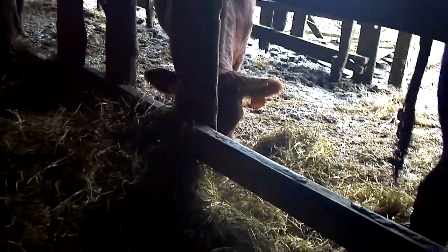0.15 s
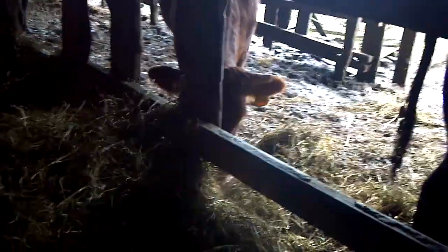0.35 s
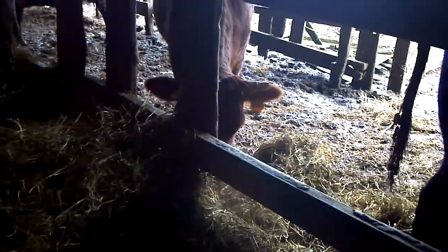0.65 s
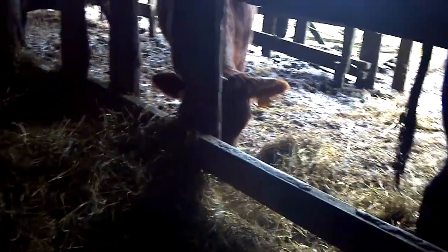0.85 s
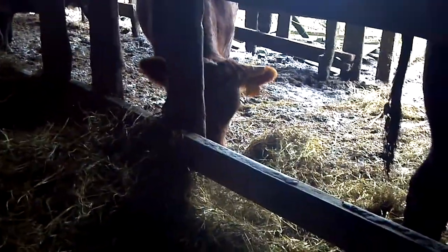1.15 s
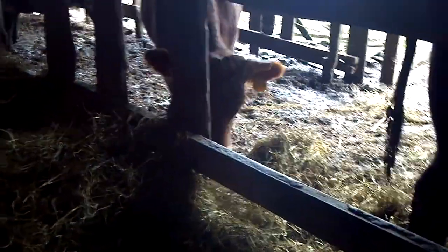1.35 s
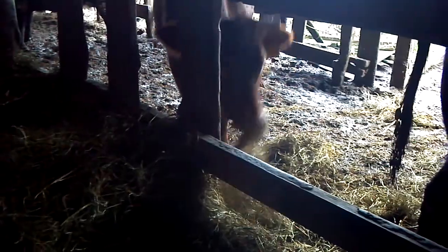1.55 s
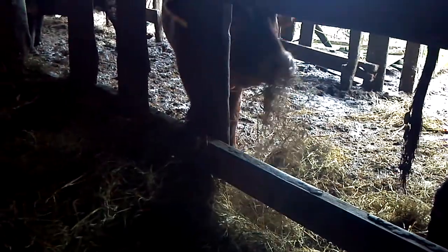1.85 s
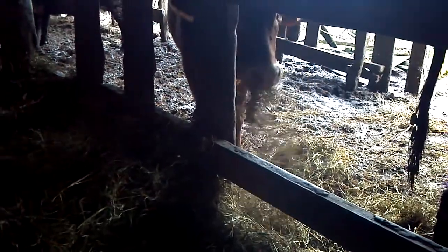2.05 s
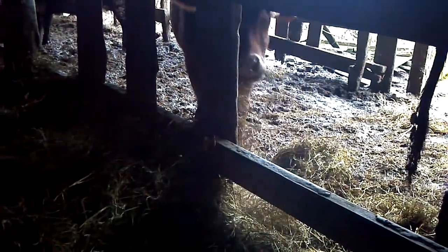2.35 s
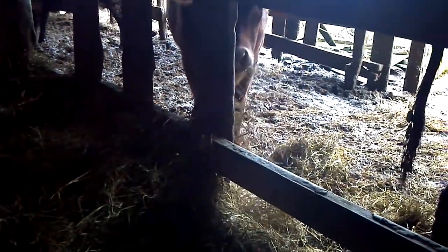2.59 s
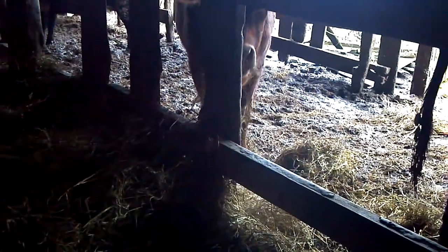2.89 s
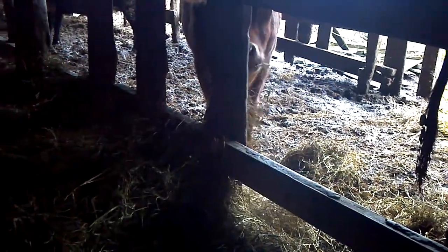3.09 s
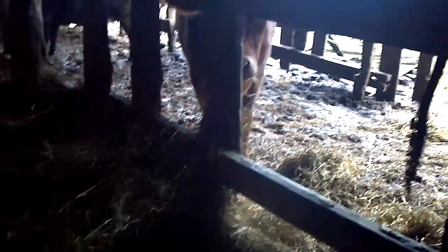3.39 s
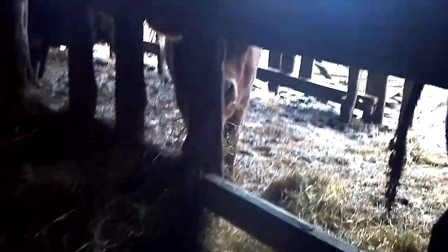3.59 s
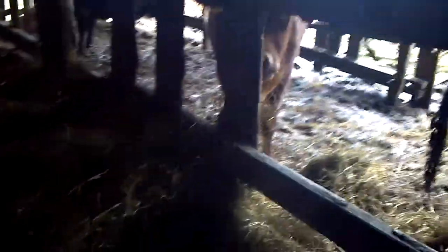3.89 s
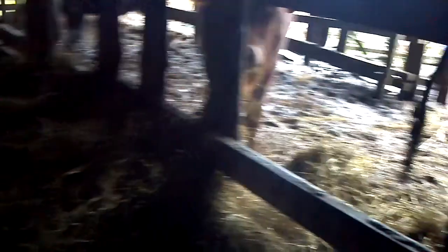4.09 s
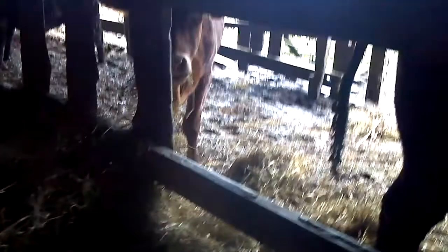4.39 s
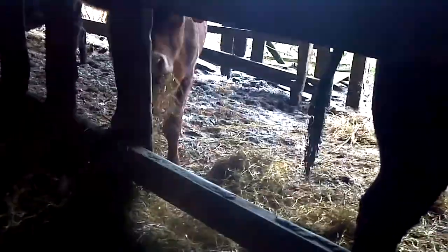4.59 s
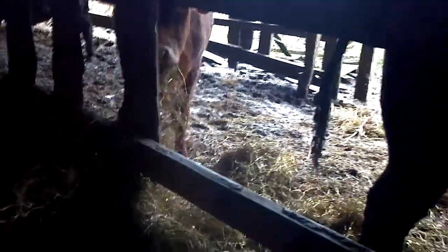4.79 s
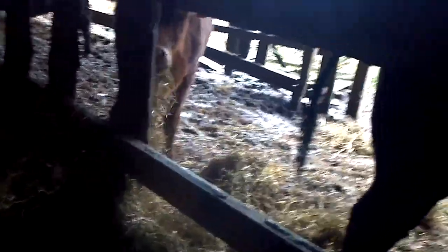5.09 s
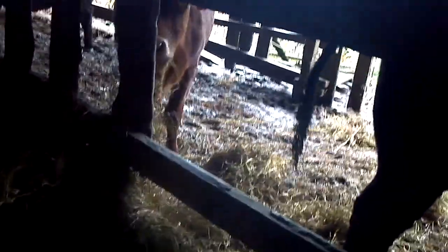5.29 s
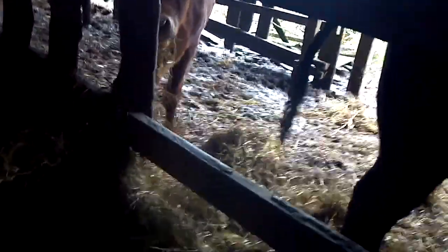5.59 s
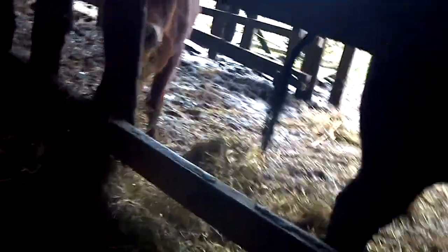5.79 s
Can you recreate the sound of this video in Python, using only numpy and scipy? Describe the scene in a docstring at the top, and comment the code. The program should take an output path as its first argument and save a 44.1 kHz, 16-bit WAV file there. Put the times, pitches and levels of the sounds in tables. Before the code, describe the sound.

Two cow moos, one brief and one long, each rising from a growl and breaking off hoarsely, with hay rustling and wooden knocks between.

```python
"""Cow in a wooden barn

A cow moos twice, a short call and a long one: pulses from the vocal folds ring the throat and mouth.
Each call starts as a low growl, climbs to a clear tone and breaks up as the pitch drops.
Between the calls she tugs at hay (clumps of tiny clicks) and bumps the feed rail (ringing modes).
Just after the second call a dry tick taps the housing of the closely spaced microphone pair;
a last soft rustle of hay follows. Echoes from the boards and a steady farmyard hush surround it all."""
import sys
import numpy as np
from scipy import signal
from scipy.fft import rfft, irfft, next_fast_len
from scipy.io import wavfile
from scipy.ndimage import uniform_filter1d

SR = 44100
rng = np.random.default_rng(int(sys.argv[2]) if len(sys.argv) > 2 else 0)


def to_wav(sig):
    """Store sig (one row per channel, or 1-D mono) as 16-bit WAV at the path in sys.argv[1].

    Samples outside -1..1 are clipped; the rate is SR.
    """
    pcm = np.clip(np.atleast_2d(sig), -1, 1) * 32767
    pcm = np.round(pcm).astype(np.int16)
    wavfile.write(sys.argv[1], SR, pcm.T)  # frames by channels


N = 262173
TIME = np.arange(N) / SR
SIZE = next_fast_len(N + SR)   # padded, so that filters do not wrap round
FREQ = np.maximum(np.arange(SIZE // 2 + 1) * SR / SIZE, 1)

# still air of the farmyard: f/Hz, relative density level/dB
YARD_SPECTRUM = [(25, -53), (55, -26.5), (90, -2.5), (140, -3), (300, -2), (700, -6), (1400, -11),
                 (2800, -14), (6000, -16), (11000, -16.5), (15000, -16.5)]
HUSH_DB = -61.5

# decay of the barn's echoes: f/Hz, t60/s
BARN_T60 = [(150, 0.31), (400, 0.37), (1500, 0.27), (4000, 0.32), (12000, 0.035)]
# standing waves of the barn that ring on after the voice: f/Hz, width/Hz, level/dB
BARN_MODES = [(358, 5, -6), (790, 9, -19)]
# pitches that the barn reinforces: f/Hz, width/Hz, level of the added resonance/dB
BARN_PEAKS = [(434.5, 16.7, 8), (538.6, 11, 2), (622, 17, 4.5), (676.7, 13, 11.5), (749.3, 35.4, 12),
              (1233, 66, 7.5), (1430, 19.7, 7.5), (1527, 7.3, 8.5), (1567, 20, 3.5), (1601, 55, 9.5),
              (1872, 37, -1), (1994, 60, 1.5), (2292, 55, 4)]

# level difference of the microphone pair: f/Hz, left minus right level/dB
PAIR_BALANCE = [(60, 0), (160, 5.8), (365, 6.6), (520, 1), (740, 1.5), (1220, 0), (2000, .5), (3300, 1.2),
                (5500, .3), (15000, 0)]
# phase by which the left microphone leads, before the lag above the knee: f/Hz, lead/rad
PAIR_LEAD = [(60, 4), (170, 1.62), (270, 1.2), (312, 0.9), (335, 0.48), (362, 2.59), (400, 1.6),
             (520, 0.078), (700, 1), (1000, 0.011)]
PAIR_LAG_S, PAIR_KNEE_HZ = 1 / 2640, 1320
CUTOFF_HZ = 15700

# resonances of the microphone housing: f/Hz, t60/s, left level/dB, right level/dB
HOUSING_MODES = [(296, 0.002, -35, -22.5), (1454, 0.003, 3, -35.5), (4730, 0.0012, -8.5, 7.5),
                 (8840, 0.00083, -22, 8), (14200, 0.00062, -10, 7.5)]
TAP_S, TAP_LEFT_LATE_S = 5.0152, 0.00033

# bumps against the feed rail: t/s, relative level/dB, spot f/Hz, scuff decay/s, share of the rail's ring/dB
BUMPS = [(2.027, -49.5, 320, 0.006, -1), (2.151, -36.5, 625, 0.0029, 3.5), (2.283, -51.5, 1350, 0.01, -1),
         (2.51, -50, 900, 0.0023, 2), (2.549, -46, 620, 0.005, 2.5), (2.785, -45.5, 1000, 0.004, -12)]
# modes of the rail: f/Hz, relative level/dB, t60/s
RAIL_MODES = [(620, -16, 0.06), (980.6, -8, 0.045), (1308.8, -15, 0.063), (1855, -3, 0.024),
              (3180, -0.5, 0.016), (4020, -4, .015), (5970, -5.5, .02)]

# tugs at the hay: peak t/s, swell/s, dull rustle level/dB, crisp rustle level/dB
HAY_TUGS = [(2.01, 0.04, -59, -64.5), (2.153, 0.015, -58, -56), (2.3, 0.013, -56, -72),
            (2.384, 0.008, -58.5, -66), (2.425, 0.025, -52.5, -60), (2.558, 0.0048, -60, -71),
            (2.94, 0.032, -89, -67), (2.98, 0.02, -61.5, -82), (5.85, 0.14, -64.5, -65.5)]
# colour of the dull rustle: f/Hz, relative level/dB
HAY_DULL = [(50, -44), (150, -6), (350, 2), (650, 0.5), (1500, 0), (2300, -10.5), (3500, -34)]
# colour of the crisp rustle: f/Hz, relative level/dB
HAY_CRISP = [(1800, -36), (3000, 9), (6500, 8), (9000, 5.5), (15000, -14)]
HAY_SETTLE_S = 0.027   # the stalks settle after each tug

# a soft closed-mouth groan in the opening of the first call
GROAN_PEAK_S, GROAN_SWELL_S, GROAN_PEAK_DB = 0.77, 0.088, -49
GROAN_HZ, GROAN_WIDTH_HZ = 398, 630

# the two calls: start t/s, break of the voice t/s, end t/s
MOOS = [(0.601, 1.603, 1.72), (3.045, 4.854, 4.99)]
# pitch of the short call before the sag at its break: t/s, f/Hz
PITCH_SHORT = [(0.62, 78.9), (0.816, 94.44), (0.904, 107.5), (1.0, 124.4), (1.06, 137.8), (1.13, 144.3),
               (1.254, 151.5), (1.398, 157.1), (1.52, 156.4), (1.61, 151.4)]
# pitch of the long call before the sag at its break: t/s, f/Hz
PITCH_LONG = [(3.08, 78.43), (3.148, 86.2), (3.34, 127.1), (3.43, 141.2), (3.504, 148.4), (3.802, 166.5),
              (4.016, 174), (4.394, 179.8), (4.63, 182.1), (4.70, 181.2), (4.79, 178.2), (4.86, 169.7)]
# effort of the short call, as the level from the open mouth before its trim: t/s, level/dB
EFFORT_SHORT = [(0.62, -73.5), (0.85, -53), (0.885, -41), (1.064, -36), (1.13, -35.5), (1.185, -34),
                (1.23, -36.5), (1.42, -31), (1.55, -29.5), (1.66, -37), (1.72, -61)]
# effort of the long call, likewise: t/s, level/dB
EFFORT_LONG = [(3.08, -70.5), (3.12, -55), (3.18, -45.5), (3.5, -33), (3.73, -30.5), (3.872, -25.5),
               (4.04, -24.5), (4.22, -31), (4.386, -21), (4.53, -24.5), (4.666, -28), (4.77, -27.5),
               (4.862, -26), (4.98, -52)]
# nasal hum of the short call before its trim: t/s, level/dB
HUM_SHORT = [(0.62, -71), (0.73, -68), (0.79, -58), (0.86, -49), (0.9, -44), (0.98, -36), (1.08, -30),
             (1.135, -35.5), (1.18, -32.5), (1.26, -35.5), (1.39, -25), (1.52, -23.5), (1.62, -24.5),
             (1.69, -34), (1.72, -37.5)]
# nasal hum of the long call, likewise: t/s, level/dB
HUM_LONG = [(3.08, -67), (3.16, -52.5), (3.3, -40), (3.39, -31.5), (3.47, -37.5), (3.55, -32),
            (3.65, -24.5), (3.79, -29), (3.92, -21), (4.22, -19), (4.58, -28.5), (4.73, -21), (4.85, -21.5),
            (4.89, -26), (4.98, -31.5)]
# main resonance of the mouth, which climbs late in the long call: t/s, f/Hz
MOUTH = [(1.08, 1220), (1.18, 1620), (1.27, 1280), (1.5, 1267), (4.15, 1214), (4.27, 1400), (4.42, 1475),
         (4.55, 1600), (4.8, 1477)]
# resonances of throat and muzzle: f/Hz, width/Hz, level/dB
THROAT_MODES = [(234, 25, -5.5), (329.4, 48, 1), (660, 453, -3.5), (1280, 733, -2.5), (2010, 440, -2.5),
                (2260, 250, -4), (3114, 465, -6), (3560, 590, -12), (3963, 300, -16)]
# nasal hum, throat, open mouth, rasp: low f/Hz, high f/Hz,
# barn echo of a clear tone/dB, barn echo of a rough tone/dB (both against the direct sound)
REGISTERS = [(210, 385, -18, -2), (410, 900, -7, 1), (940, 1700, -4, 5), (1780, 4000, 2, 6)]
# trim of each register: level/dB
REGISTER_TRIM = [0.18, 0.64, 0.36, 0.17]
# throat and rasp grow with effort, then level off:
# level relative to effort/dB, ceiling level/dB, change in the croak/dB, change in the growl/dB
THROAT_LAW = (3.5, -29.5, 5.5, -9.5)
RASP_LAW = (-0.5, -32.5, 0, -2.5)
# air rushing through the open mouth: f/Hz, relative level/dB
AIR_SPECTRUM = [(2500, 0), (3600, -14.5), (4700, -7), (6500, -11.5), (10000, -10), (15000, -14.5)]
AIR_DB = -12.5   # against the rasp

# slack folds beat unevenly below the clear pitch, and fully so one span lower
CLEAR_HZ, GROWL_SPAN_HZ, GROWL_ROUGH, CLEAR_ROUGH = 145.35, 22.24, 0.4094, 0.031
# at the break the pitch loses a share with this time constant, and the croak sets in
BREAK_S, BREAK_PITCH_LOSS, CROAK_ROUGH, CROAK_ONSET_S = 0.045, 0.28, 0.793, 0.026
# the croak opens a resonance in the throat
CROAK_HZ, CROAK_WIDTH_HZ, CROAK_GAIN = 770, 450, 0.354
# the mouth colours the turbulence
HOARSE_HZ, HOARSE_WIDTH_HZ, HOARSE_GAIN = 1274, 250, 1.4
# the chest adds more of the fundamental once the pitch has risen past its knee
CHEST_DB, CHEST_FLOOR_DB, CHEST_KNEE_HZ, CHEST_SPAN_HZ = -45.5, -59.5, 150.2, 0.76
# a rough voice rumbles in the chest: level relative to the hum, and its ceiling
CHEST_RUMBLE_DB, CHEST_RUMBLE_TOP_DB = -4, -57


def from_db(db):
    """Decibels to gain."""
    return 10 ** (np.asarray(db) / 20)


def rms_one(x):
    """Scale to unit rms."""
    return x / np.sqrt(np.mean(x ** 2) + 1e-20)


def in_time(rows):
    """Each column of a curve at every sample."""
    s, *columns = np.transpose(rows)
    return [np.interp(TIME, s, column) for column in columns]


def at_hz(points, hz):
    """Read a spectrum on a log-frequency axis."""
    table = np.array(points)
    return np.interp(np.log(hz), np.log(table[:, 0]), table[:, 1])


def gate(start_s, end_s, fade_s=0.013):
    """One while a call lasts, fading to nothing outside it."""
    return np.interp(TIME, [start_s - fade_s, start_s, end_s, end_s + fade_s], [0, 1, 1, 0])


def swell(peak_s, swell_s, settle_s=0.077):
    """An envelope that rises exponentially to its peak and dies away exponentially."""
    return np.exp(-np.maximum((peak_s - TIME) / swell_s, (TIME - peak_s) / settle_s))


def shaped(x, response):
    """Filter by a frequency response."""
    return irfft(rfft(x, SIZE) * response, SIZE)[..., :N]


def band(x, low_hz, high_hz):
    """Steep band-pass."""
    return signal.sosfilt(signal.butter(4, [low_hz, high_hz], "band", fs=SR, output="sos"), x)


def drift(knee_hz):
    """Smooth random wander of spread 1, slower than the knee."""
    return rms_one(shaped(rng.standard_normal(N), 1 / (1 + (FREQ / knee_hz) ** 2)))


def coloured(x, spectrum):
    """Give a signal a spectrum, at unit rms."""
    return rms_one(shaped(x, from_db(at_hz(spectrum, FREQ))))


def resonance(x, hz, width_hz):
    """Two-pole resonance with gain 1 on top."""
    r = np.exp(-np.pi * width_hz / SR)
    poles = [1, -2 * r * np.cos(2 * np.pi * hz / SR), r * r]
    return signal.lfilter(np.array([1, 0, -1]) * (1 - r * r) / 2, poles, x)


def ring(x, hz, t60):
    """A unit click sets a dying sine of height 1 ringing."""
    r = np.exp(-np.log(1000) / (t60 * SR))
    w = 2 * np.pi * hz / SR
    return signal.lfilter([0, np.sin(w)], [1, -2 * r * np.cos(w), r * r], x + 1e-18)


def evened(x, window_s=0.14):
    """Hold the short-term level at 1."""
    size = int(window_s * SR)
    power = uniform_filter1d(uniform_filter1d(x * x, size), size)
    return x / np.sqrt(power + 1e-12)


def yard(apart=0.028, rumble_apart_hz=250):
    """A soft, steady hush of coloured noise; its lowest part differs between the microphones."""
    common, own = coloured(rng.standard_normal((2, N)), YARD_SPECTRUM)
    own = shaped(own, apart + 0.5 / (1 + (FREQ / rumble_apart_hz) ** 2))
    return from_db(HUSH_DB) * (common + own * np.array([[1], [-1]]))


def barn(x, apart=0.26, first_echo_s=0.0026):
    """Dense echoes from boards and roof, dying soonest in the top treble, nearly alike at both microphones."""
    t = TIME[:SR * 3 // 4]
    common, own = rng.standard_normal((2, len(t)))
    white = common + apart * own * np.array([[1], [-1]])
    tail = 0
    edges = np.geomspace(60, 16000, 9)
    for low, high in zip(edges, edges[1:]):
        t60 = at_hz(BARN_T60, np.sqrt(low * high))
        tail = tail + band(white, low, high) * np.exp(-np.log(1000) * t / t60)
    # bring the tail to about unit energy
    tail = tail * (t > first_echo_s) / np.sqrt(SR * at_hz(BARN_T60, 1000) / (2 * np.log(1000)))
    return signal.fftconvolve(tail, x[None], axes=1)[:, :N]


def microphone_pair(x):
    """The low end leans left; above the knee the left channel lags by a fixed delay."""
    lead = at_hz(PAIR_LEAD, FREQ) - 2 * np.pi * PAIR_LAG_S * np.maximum(FREQ - PAIR_KNEE_HZ, 0)
    lean = from_db(at_hz(PAIR_BALANCE, FREQ) / 2)
    return shaped(x, np.array([lean * np.exp(1j * lead), 1 / lean]))


def tap(low_cut_hz=220):
    """A hard, dry tick rings the housing: sharp at the right microphone, later and duller at the left."""
    right, left = np.zeros((2, N))
    right[int(TAP_S * SR)] = 1
    left[int((TAP_S + TAP_LEFT_LATE_S) * SR)] = 1
    tick = np.zeros((2, N))
    for hz, t60, left_db, right_db in HOUSING_MODES:
        tick[0] += from_db(left_db) * ring(left, hz, t60)
        tick[1] += from_db(right_db) * ring(right, hz, t60)
    return signal.sosfilt(signal.butter(1, low_cut_hz, "high", fs=SR, output="sos"), tick)


def rail(spot_cycles=21, spot_db=8.0, level_db=1, note_hz=620, note_t60_s=0.47, note_db=-28):
    """Each bump is a brief scuff that rings the rail and the spot it touches; the lowest note rings on."""
    out = np.zeros(N)
    t = TIME[:SR // 3]
    for s, bump_db, spot_hz, scuff_s, rail_db in BUMPS:
        scuff = rng.standard_normal(len(t)) * np.exp(-t / scuff_s)
        knock = from_db(spot_db) * ring(scuff, spot_hz, spot_cycles / spot_hz)
        for mode_hz, db, t60 in RAIL_MODES:
            knock = knock + from_db(db + rail_db) * ring(scuff, mode_hz, t60)
        note = from_db(note_db + rail_db) * ring(1.0 * (t == 0), note_hz, note_t60_s)
        start = int(s * SR)
        out[start:start + len(t)] += from_db(bump_db + level_db) * (knock / np.abs(knock).max() + note)
    return band(out, 260, 12000)


def hay(snaps_per_s=1800, clump_db=1.0, clump_knee_hz=45):
    """Dry stalks slide and snap in clumps of tiny clicks."""
    dull, crisp = np.zeros((2, N))
    for s, swell_s, dull_db, crisp_db in HAY_TUGS:
        tug = swell(s, swell_s, HAY_SETTLE_S)
        dull += from_db(dull_db) * tug
        crisp += from_db(crisp_db) * tug
    snaps = rng.standard_normal(N) * (rng.random(N) < snaps_per_s / SR)
    snaps = snaps * from_db(clump_db * drift(clump_knee_hz))
    return dull * coloured(snaps, HAY_DULL) + crisp * coloured(snaps, HAY_CRISP)


def slackness(pitch):
    """Slack of the folds (0-1), growing as the pitch falls below the clear tone."""
    return np.clip((CLEAR_HZ - pitch) / GROWL_SPAN_HZ, 0, 1)


def larynx():
    """Pitch in Hz, roughness and croak (0-1): a growl at low pitch, then a clear tone, then the break."""
    pitch, = in_time(list(PITCH_SHORT) + list(PITCH_LONG))
    since_break = sum(np.maximum(TIME - break_s, 0) * (TIME < end_s + 0.5) for _, break_s, end_s in MOOS)
    broken = np.minimum(since_break / CROAK_ONSET_S, 1)
    rough = CLEAR_ROUGH + GROWL_ROUGH * slackness(pitch) + CROAK_ROUGH * broken
    sag = BREAK_PITCH_LOSS * (1 - np.exp(-since_break / BREAK_S))
    return pitch * (1 - sag), rough, broken


def groan():
    """With the mouth shut, a few low harmonics sound through the nose."""
    pitch = larynx()[0]
    phase = 2 * np.pi * np.cumsum(pitch) / SR
    tone = sum(np.cos(k * phase) for k in range(2, 6))
    nasal = rms_one(resonance(tone, GROAN_HZ, GROAN_WIDTH_HZ))
    return from_db(GROAN_PEAK_DB) * swell(GROAN_PEAK_S, GROAN_SWELL_S) * nasal


def vocal_folds(pitch, rough, mouth_hz, jitter=0.04, flutter=0.00264, shimmer=0.48, breathiness=1.0,
                leak=0.41, mouth_gain=1.34, mouth_width_hz=118, croak=0.9, flap_db=3.5, flap_knee_hz=45):
    """One pulse per closure; roughness unsettles timing and strength and adds a puff of noise to each cycle."""
    unsteady = pitch * (1 + jitter * rough * drift(111.6) + flutter * drift(12.0))
    phase = 2 * np.pi * np.cumsum(unsteady) / SR
    # the mouth's moving resonance lifts whichever harmonic lies closest
    pulses = 0
    for k in range(1, 45):
        lift = mouth_gain / (1 + ((k * pitch - mouth_hz) / mouth_width_hz) ** 2)
        pulses = pulses + np.cos(k * phase) * (1 + lift)
    pulses = pulses * (1 + shimmer * rough * drift(35))
    # in the croak, closures alternate strong and weak
    pulses = pulses * (1 + croak * rough ** 2 * np.sin(phase / 2))
    # turbulence is weak in the bass, so the lowest harmonics stay clean
    puffs = shaped(rng.standard_normal(N) * (1 + np.cos(phase)) ** 2, FREQ / np.hypot(FREQ, 3000))
    puffs = puffs + HOARSE_GAIN * resonance(puffs, HOARSE_HZ, HOARSE_WIDTH_HZ)
    turbulence = (leak + breathiness * rough) * rms_one(puffs) * np.sqrt(SR / pitch) / 2
    # slack folds flap, so tone and turbulence come in uneven bursts
    bursts = from_db(flap_db * np.sqrt(np.abs(rough)) * np.tanh(drift(flap_knee_hz)))
    return bursts * (pulses + turbulence), phase


def register_levels(pitch, broken):
    """Gains of nasal hum, throat, open mouth and rasp; throat and rasp follow the effort of the open mouth."""
    effort, = from_db(in_time(list(EFFORT_SHORT) + list(EFFORT_LONG)))
    hum, = from_db(in_time(list(HUM_SHORT) + list(HUM_LONG)))
    slack = slackness(pitch) * (1 - broken)

    def follow(share_db, ceiling_db, croak_db, growl_db):
        """Grow with the effort and level off softly at a ceiling."""
        limited = 1 / np.hypot(1 / (effort * from_db(share_db)), from_db(-ceiling_db))
        return limited * from_db(croak_db * broken + growl_db * slack)

    return np.array([hum, follow(*THROAT_LAW), effort, follow(*RASP_LAW)])


def cow():
    """The pulses ring the throat; each register swells as the call opens, and buzzing air comes with the rasp."""
    pitch, rough, broken = larynx()
    mouth_hz, = in_time(MOUTH)
    folds, phase = vocal_folds(pitch, rough, mouth_hz)
    # throat and muzzle, neighbouring resonances in opposite polarity
    voice = sum((-1) ** k * from_db(db) * resonance(folds, hz, width)
                for k, (hz, width, db) in enumerate(THROAT_MODES))
    voice = voice + CROAK_GAIN * resonance(broken * folds, CROAK_HZ, CROAK_WIDTH_HZ)
    voice = voice + sum(from_db(db) * resonance(voice, hz, width) for hz, width, db in BARN_PEAKS)

    sounding = sum(gate(start_s, end_s) for start_s, _, end_s in MOOS)
    levels = sounding * register_levels(pitch, broken)

    past_knee = 1 / (1 + np.exp((CHEST_KNEE_HZ - pitch) / CHEST_SPAN_HZ))
    chest = from_db(CHEST_FLOOR_DB) + from_db(CHEST_DB) * past_knee
    rumble = np.minimum(from_db(CHEST_RUMBLE_DB) * levels[0], from_db(CHEST_RUMBLE_TOP_DB))
    rumble = rumble * np.clip(2 * rough, 0, 1)
    direct = sounding * chest * np.sin(phase) + rumble * evened(band(folds, 140, 210))

    to_barn = 0
    for level, trim_db, (low_hz, high_hz, clear_db, rough_db) in zip(levels, REGISTER_TRIM, REGISTERS):
        # a rough voice stirs the whole barn
        wet = from_db(clear_db + (rough_db - clear_db) * np.clip(rough, 0, 1))
        # direct sound and echo share the register's power
        register = level / np.hypot(1, wet) * from_db(trim_db) * evened(band(voice, low_hz, high_hz))
        direct = direct + register
        to_barn = to_barn + wet * register

    buzz = evened(folds) + rng.standard_normal(N)
    air = from_db(AIR_DB) * levels[-1] * coloured(buzz, AIR_SPECTRUM)
    ringing = sum(from_db(db) * resonance(direct, hz, width) for hz, width, db in BARN_MODES)
    return direct + air / 2 + ringing + barn(to_barn + air, apart=0.17)


def scene():
    """Cow, feeding noises and yard reach the pair through the air; the tap comes through the housing."""
    feeding = hay() + rail()
    airborne = yard() + feeding + from_db(-9.5) * barn(feeding) + groan() + cow()
    return microphone_pair(airborne) + tap()


def record(dry):
    """Overload stops at full scale and the top is cut."""
    top_cut = signal.ellip(10, 0.1, 80, CUTOFF_HZ, fs=SR, output="sos")
    return signal.sosfilt(top_cut, np.clip(dry, -1, 1))


dry = scene()
out = record(dry)
to_wav(out)
```